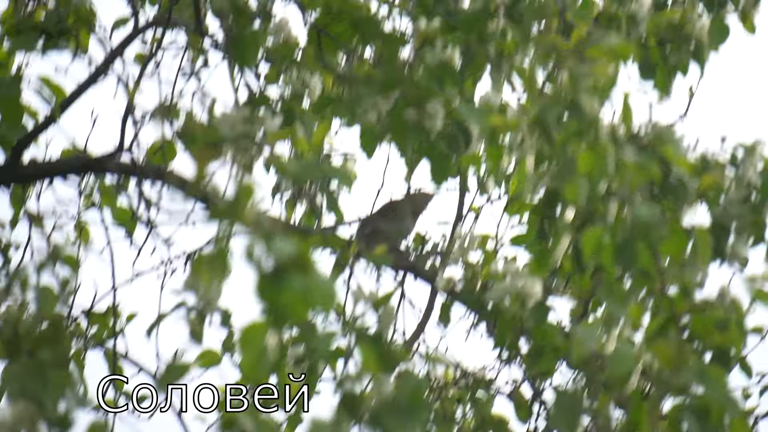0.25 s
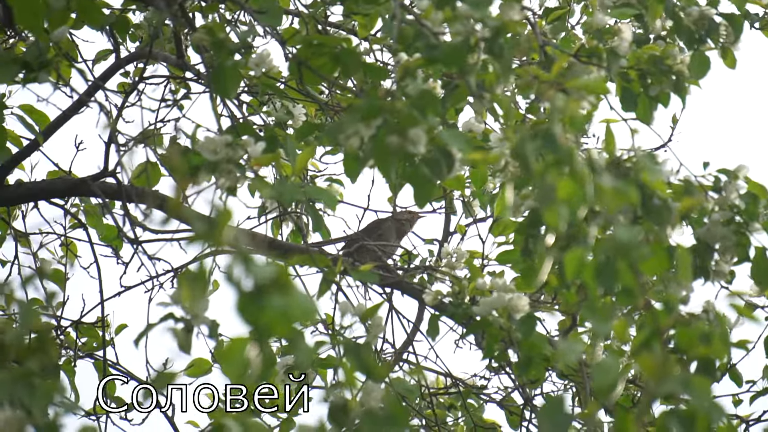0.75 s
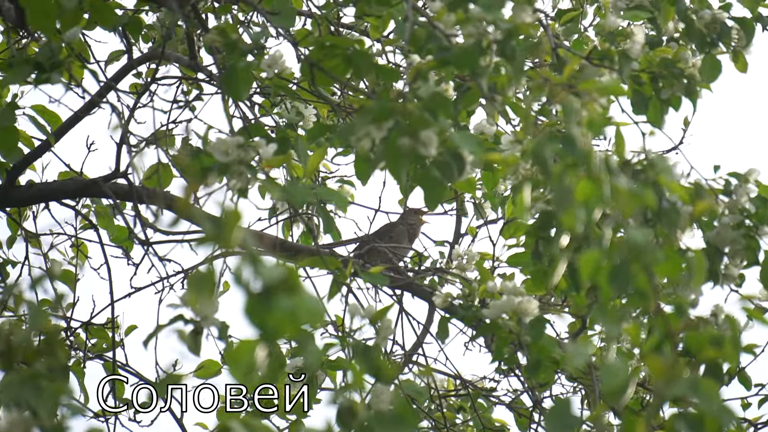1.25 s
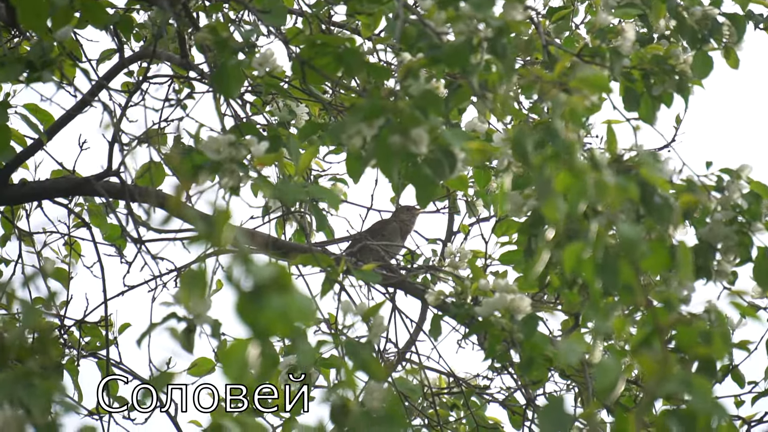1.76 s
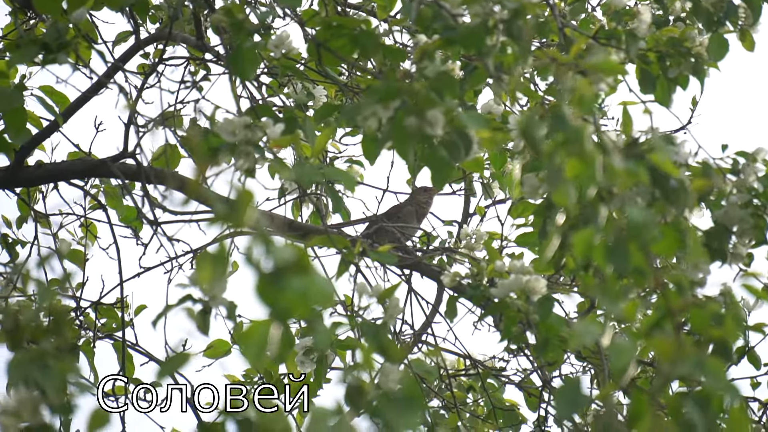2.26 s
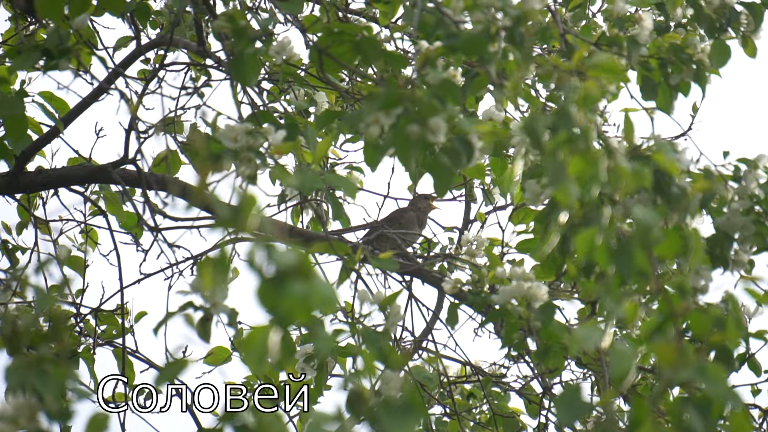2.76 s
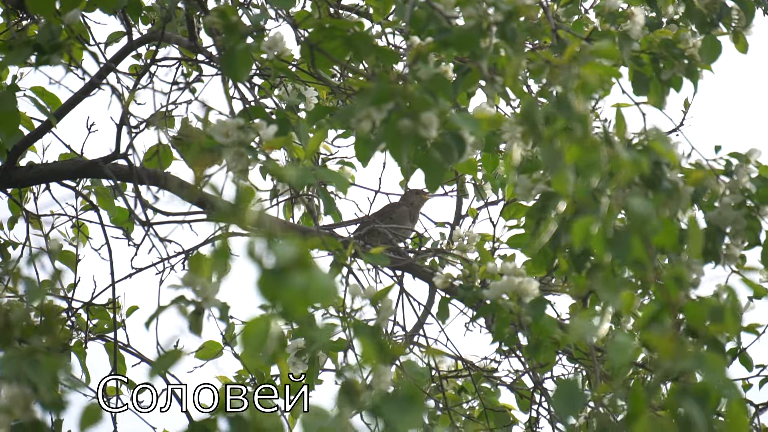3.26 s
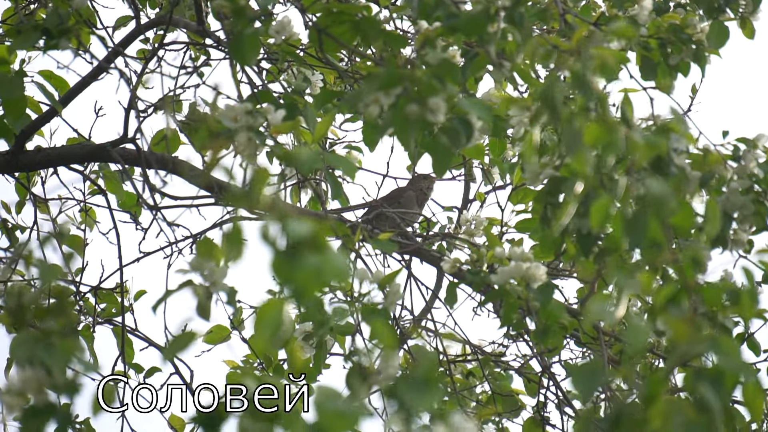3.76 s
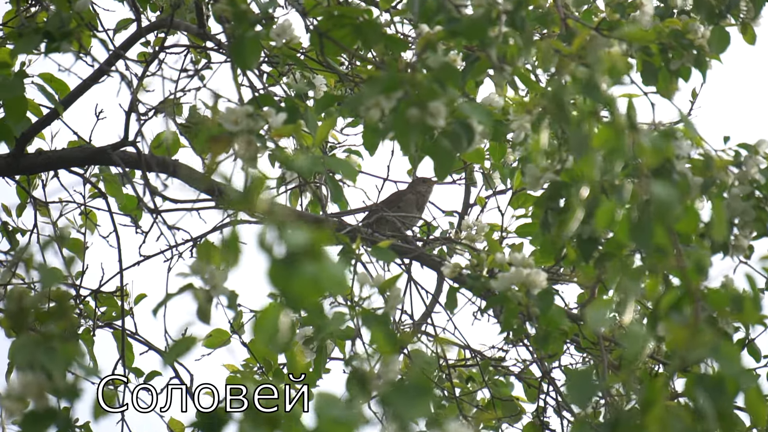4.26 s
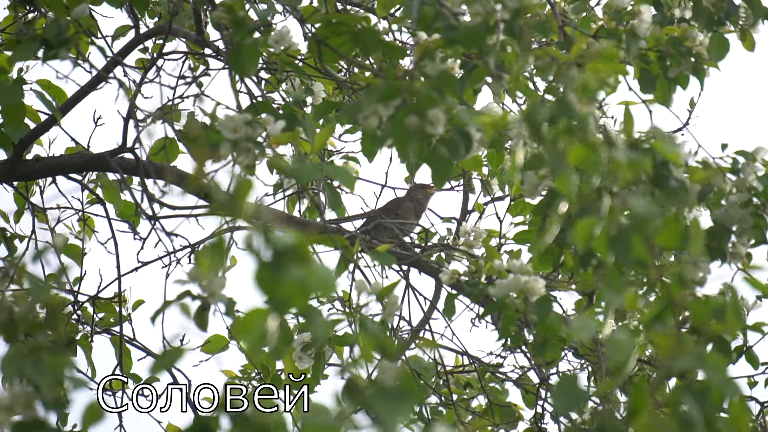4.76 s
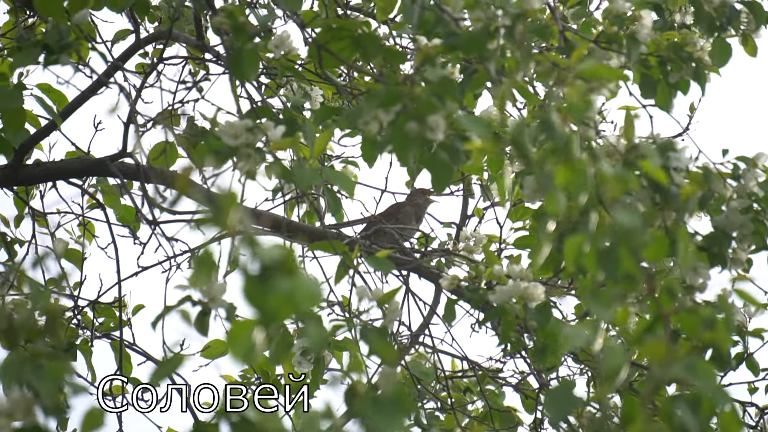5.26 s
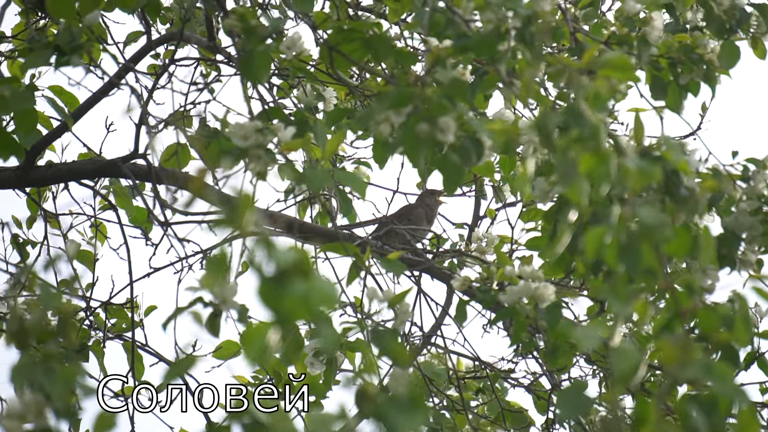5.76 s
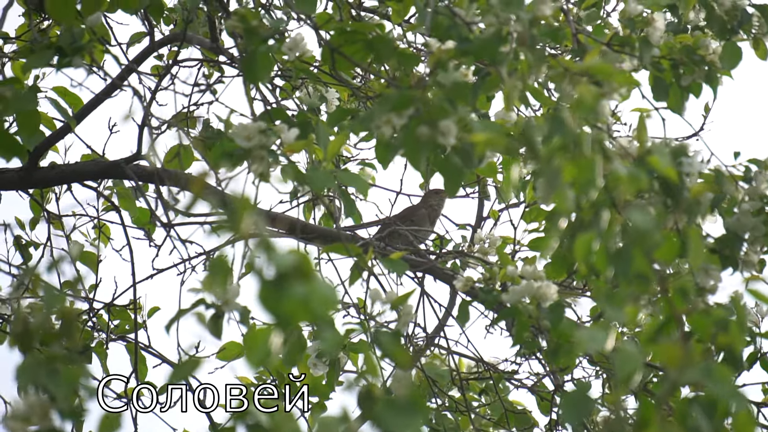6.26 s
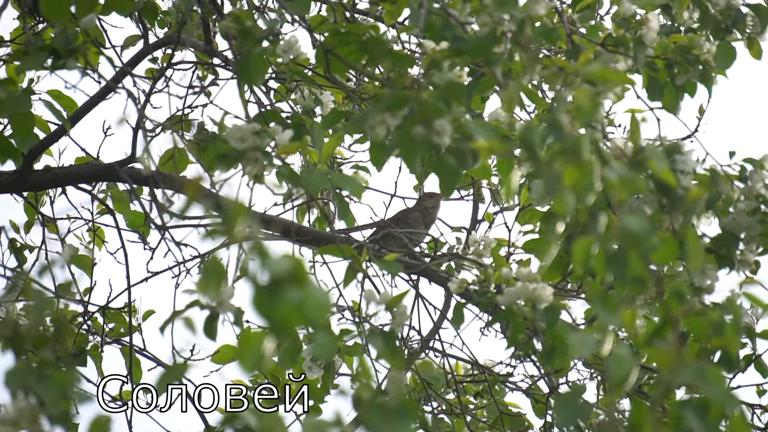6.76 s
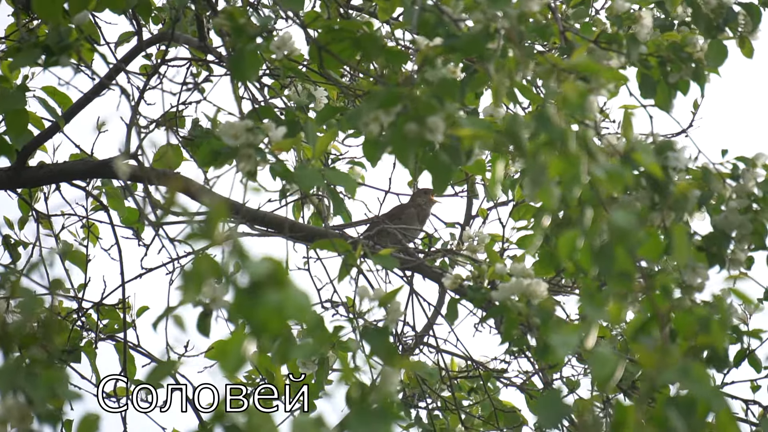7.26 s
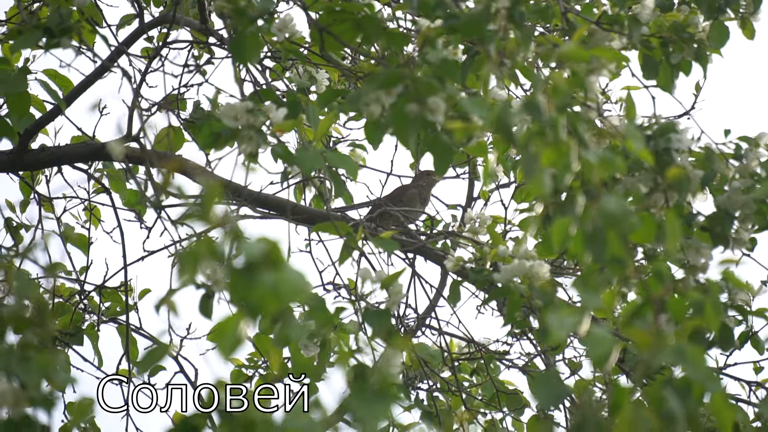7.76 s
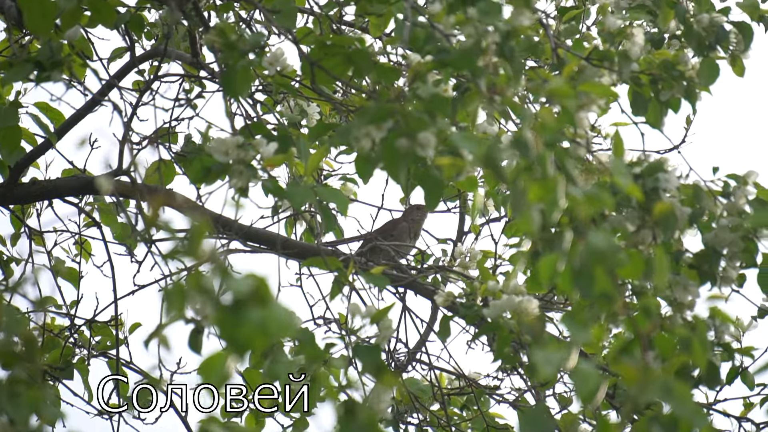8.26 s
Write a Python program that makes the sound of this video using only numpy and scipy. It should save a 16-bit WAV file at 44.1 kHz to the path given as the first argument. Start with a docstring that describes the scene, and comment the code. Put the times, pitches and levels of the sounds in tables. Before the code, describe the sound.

A nightingale sings loudly outdoors, mixing clear whistles, dry rattles, steep slurs and chucks, while hands rustle and bump the microphone.

```python
"""Nightingale in foliage

A nightingale sings whistles, steep slurs and chucks as frequency-modulated tones with weak overtones.
Its dry clicks and rattles are short bursts of snaps, falling sweep and noise; foliage scatters the sound.
A second bird further off repeats a thin falling note, as a sine gliding at a constant rate in octaves.
Close by, filtered noise rustles against the hand-held microphone, with damped bumps and single slips,
over a low outdoor rumble and a wash of air and leaves, both made of coloured noise."""
import sys
import numpy as np
from scipy import signal
from scipy.fft import rfft, irfft, next_fast_len
from scipy.io import wavfile
from scipy.ndimage import uniform_filter1d, minimum_filter1d

SR = 44100
rng = np.random.default_rng(int(sys.argv[2]) if len(sys.argv) > 2 else 0)


def unload_audio(sound):
    """Save the sound as a 16-bit wav file, at the path given as the first command line argument."""
    columns = np.transpose(np.atleast_2d(sound))
    # keep every value between -1 and 1, then stretch to whole-number steps
    steps = np.round(np.clip(columns, -1, 1) * 32767)
    wavfile.write(sys.argv[1], SR, steps.astype(np.int16))


N = 375732
TIME = np.arange(N) / SR
CUTOFF_HZ = 15800  # upper band limit


def from_db(db):
    """Decibel law: 20 dB is a tenfold amplitude."""
    return 10 ** (np.asarray(db) / 20)


def rms_one(x):
    """Normalisation to unit root-mean-square amplitude."""
    return x / np.sqrt(np.mean(x ** 2) + 1e-20)


def in_time(rows):
    """Linear interpolation of a control curve at every sample."""
    times, values = np.transpose(rows)
    return np.interp(TIME, times, values)


def at_hz(points, hz):
    """Interpolation of a spectrum in dB along a logarithmic frequency axis."""
    freqs, levels = np.transpose(points)
    return np.interp(np.log(np.maximum(hz, 1)), np.log(freqs), levels)


def coloured(x, spectrum):
    """Linear filtering: each frequency component is multiplied by its gain."""
    size = next_fast_len(len(x))
    gain = from_db(at_hz(spectrum, np.fft.rfftfreq(size, 1 / SR)))
    return irfft(rfft(x, size) * gain, size)[:len(x)]


def drift(rate):
    """Random modulation: normal draws at the given rate per second, joined by straight lines."""
    knots = rng.standard_normal(N // 8)
    return np.interp(TIME * rate, np.arange(len(knots)), knots)


def butter(x, hz, kind, order=2):
    """Recursive filtering with a maximally flat passband."""
    sections = signal.butter(order, hz, kind, fs=SR, output="sos")
    return signal.sosfilt(sections, x + 1e-18)


def add(track, s, sound):
    """Superposition: mix a sound into a track at time s."""
    start = max(round(s * SR), 0)
    part = sound[:max(N - start, 0)]
    track[start:start + len(part)] += part


# Level of the low rumble. Each row: time in seconds, level in dB before trim and flutter.
RUMBLE_LEVEL = [(0, -23.5), (.28, -28.5), (.45, -18), (.73, -30), (1.07, -16), (1.23, -23), (1.99, -22),
                (2.3, -27.5), (3.25, -28), (3.8, -30.5), (5.1, -24.5), (5.6, -29.5), (6.06, -29),
                (6.55, -29.5), (6.65, -15), (6.88, -28.5), (8.52, -30.5)]
# Spectrum of the rumble. Each row: frequency in Hz, gain in dB.
RUMBLE_COLOUR = [(15, 4), (30, 0), (50, -3.5), (66, -3), (85, -13), (130, -22), (250, -32.5), (600, -37.5)]
# Level of the wash of air and leaves. Each row: time in seconds, level in dB.
AIR_LEVEL = [(0, -39), (1.9, -39), (2.15, -45.5), (4.2, -45), (7.1, -42.5), (7.4, -43.5)]
# Spectrum of the wash. Each row: frequency in Hz, gain in dB.
AIR_COLOUR = [(60, 9.5), (150, 3), (300, -1), (700, 4), (1100, 0.5), (1700, -11.5), (3000, -9.5),
              (4400, -6.5), (5600, -24), (7500, -24.5), (9500, -12.5), (12000, -22.5), (15500, -21.5)]


def outdoors(trim_db=-1.5, flutter_db=1.9):
    """Stationary noise shaped in spectrum and level: low rumble under a wash of air and leaves."""
    rumble = coloured(rng.standard_normal(N), RUMBLE_COLOUR + [(2000, -100)])
    rumble = rms_one(butter(rumble, 13.3, "high"))
    air = rms_one(coloured(rng.standard_normal(N), AIR_COLOUR))
    rumble_db = in_time(RUMBLE_LEVEL) + trim_db + flutter_db * drift(13)
    return from_db(rumble_db) * rumble + from_db(in_time(AIR_LEVEL)) * air


# Bumps on the microphone. Each row: start in seconds, level in dB before the common trim.
BUMPS = [(.523, -16.5), (.989, -17.5), (1.045, -15.5), (1.104, -13), (2.778, -22), (3.239, -26),
         (3.296, -16.5), (5.318, -17.5), (5.896, -21), (6.045, -13.5), (6.648, -9.5), (6.792, -16)]


def bumps(thud_hz=160, thud_s=0.0051, knock_hz=420, knock_s=0.0062, knock=0.41, trim_db=1):
    """Damped oscillation: a heavily damped thud joined by a decaying burst of low-passed noise."""
    out = np.zeros(N)
    t = np.arange(SR // 10) / SR
    for s, db in BUMPS:
        thud = np.sin(2 * np.pi * thud_hz * t) * np.exp(-t / thud_s)
        crunch = rms_one(butter(rng.standard_normal(len(t)), knock_hz, "low")) * np.exp(-t / knock_s)
        add(out, s, from_db(db + trim_db) * (thud + knock * crunch))
    return out


# Single slips at the microphone. Each row: start in seconds, level in dB before the decay.
TICKS = [(2.159, -22.5), (3.3, -18), (6.049, -12), (7.124, -29), (8.178, -33)]


def ticks(decay_s=0.0013):
    """Impulsive excitation: short noise bursts with exponential decay and the colour of the rubbing."""
    out = np.zeros(N)
    t = np.arange(SR // 100) / SR
    for s, db in TICKS:
        slip = rms_one(coloured(rng.standard_normal(len(t)), RUB_COLOUR))
        add(out, s, from_db(db) * slip * np.exp(-t / decay_s))
    return out


# First long rub. Each row: time in seconds, level of its hiss in dB before the trims.
LONG_RUB = [(0.78, -52), (0.854, -37.5), (0.974, -27.5), (0.994, -13.5), (1.028, -40), (1.056, -26.5),
            (1.068, -35.5), (1.118, -25.5), (1.22, -39.5), (1.45, -24.5), (1.47, -35), (1.778, -26),
            (1.828, -20), (1.86, -23), (2.108, -35), (2.18, -62)]
# Separate short rubs. Each row: start, hardest point and end in seconds, level at the hardest in dB
# before the common trim.
SHORT_RUBS = [(2.53, 2.79, 3.07, -29), (2.97, 3.044, 3.18, -33.5), (3.228, 3.24, 3.16, -22.5),
              (3.311, 3.37, 3.51, -23.5), (3.613, 3.702, 3.8, -35.5), (3.83, 3.868, 3.98, -36.5),
              (4.11, 4.117, 4.38, -41.5), (4.292, 4.408, 4.49, -32), (4.572, 4.79, 4.94, -26),
              (5.033, 5.141, 5.185, -22), (5.258, 5.302, 5.75, -36.5), (5.67, 5.715, 5.8, -28),
              (5.885, 5.925, 5.99, -24.5), (6.047, 6.05, 6.17, -21), (6.48, 6.666, 6.72, -25),
              (6.782, 6.81, 6.99, -23), (7.001, 7.011, 7.062, -23)]


def rub_level(long_trim_db=3, rest_db=-63, swell_db=8.5, catch_db_per_s=4000, release_db_per_s=491):
    """Contact pressure as a level in dB: at each moment the strongest of all rubs and light contact."""
    s, db = np.transpose(LONG_RUB)
    long_rub = np.interp(TIME, s, db + long_trim_db, left=rest_db, right=rest_db)
    level = np.maximum(long_rub, rest_db)
    # a short rub catches quickly, swells to its hardest point and lets go more slowly
    for start, hardest, end, peak_db in SHORT_RUBS:
        swell = np.interp(TIME, [start, hardest, end], [-swell_db, 0, -swell_db])
        catch = catch_db_per_s * np.maximum(start - TIME, 0)
        release = release_db_per_s * np.maximum(TIME - end, 0)
        level = np.maximum(level, peak_db + swell - (catch + release))
    return level


# Resonances of the microphone housing. Each row: frequency in Hz, gain in dB.
RUB_COLOUR = [(300, -10), (900, -14.5), (1800, -17.5), (3000, -16.5), (4000, -8), (4800, -0.5), (5800, 2.5),
              (6700, -12), (7900, -11.5), (9400, -2), (10800, -19), (12300, -15.5), (14200, -32),
              (15800, -32)]


def rustle(grain_db=-1.5, stick_db=2.5, trim_db=1):
    """Stick-slip friction: dense tiny slips hiss in the resonances of the microphone housing."""
    unevenness_db = grain_db * drift(1500) + stick_db * drift(110)
    slips = rng.standard_normal(N) * from_db(unevenness_db)
    return rms_one(coloured(slips, RUB_COLOUR)) * from_db(rub_level() + trim_db)


# Runs of the far bird. Each row: first and last note start in seconds, count of notes,
# note length in seconds, level in dB before the common trim.
FAR_RUNS = [(0.449, 0.901, 8, .026, -26.5), (1.047, 1.123, 2, .026, -23.5), (1.999, 2.266, 4, 0.046, -28),
            (3.204, 3.759, 9, .028, -29.5), (5.228, 5.604, 5, .044, -31), (6.46, 6.789, 6, .023, -31),
            (7.657, 8.146, 6, .042, -27.5)]


def far_notes():
    """Isochronous rhythm: an even beat within each run, as (start s, length s, dB)."""
    out = []
    for first, last, count, length, db in FAR_RUNS:
        out += [(s, length, db) for s in np.linspace(first, last, round(count))]
    return out


def far_bird(middle_hz=3500, octaves_per_s=15, trim_db=-1):
    """Exponential glide: all notes fall at one rate in octaves, so longer ones span more."""
    out = np.zeros(N)
    for s, length, db in far_notes():
        t = np.arange(round(length * SR)) / SR
        pitch = middle_hz * 2 ** (octaves_per_s * (length / 2 - t))
        swell = np.sqrt(np.abs(np.sin(np.pi * t / length))) * (1 - .5 * t / length)
        tone = np.sin(2 * np.pi * np.cumsum(pitch) / SR)
        add(out, s, from_db(db + trim_db) * swell * tone)
    return out


# Spectrum of the echoes. Each row: frequency in Hz, gain in dB.
ECHO_COLOUR = [(900, -1), (1700, -1.5), (2350, 4), (3100, 3), (4400, 6.5), (5400, 3.5), (7000, 11.5),
               (10000, 9), (15000, -15)]


def foliage(x, near_db=-12, near_t60=0.14, far_db=-22, far_t60=0.88, dull_hz=5500):
    """Scattering by convolution: branches return sparse echoes, trees beyond a longer, duller tail."""
    t = np.arange(int(1.5 * SR)) / SR
    # about 2500 echoes a second, beginning after 2 ms; t60 is the time in seconds to fall by 60 dB
    branches = rng.standard_normal(len(t)) * (rng.random(len(t)) < 2500 / SR) * (t > .002)
    near = branches * from_db(-60 * t / near_t60)
    tail = butter(rng.standard_normal(len(t)), dull_hz, "low")
    far = tail * from_db(-60 * t / far_t60) * (1 - np.exp(-t / 0.0022))
    echoes = from_db(near_db) * near / np.linalg.norm(near) + from_db(far_db) * far / np.linalg.norm(far)
    return signal.fftconvolve(x, coloured(echoes, ECHO_COLOUR))[:N]


# Rattles, a buzz and then three clicks. Each row: start in seconds, level in dB and treble gain in dB,
# both before the common trims.
RATTLES = [(2.507, -6, -10.5), (2.785, -5.5, -4.5), (3.067, -8, -4.5), (3.364, -6.5, -9)]
BUZZ_S, BUZZ_DB = 0.021, -2  # the level is against the clicks
RATTLE_FIRST_S, RATTLE_GAP_S, RATTLE_CLICK_S = .037, .029, 0.0058
# the clicks before a slur start light and end loud and dull: (dB, length s, treble dB), before trims
LIGHT_CLICK, DULL_CLICK = (-12.5, 0.0052, -6), (-7.5, 0.0046, -16.5)
LAST_CLICK_LEAD_S = .015
# chucks open with a faint click: dB against the note, treble dB, both before trims; length s
CHUCK_CLICK_DB, CHUCK_CLICK_BRIGHT_DB, CHUCK_CLICK_S = -14.5, -8.5, 0.0046
# pips carry a faint bright buzz: dB against the note, treble dB, both before trims
PIP_BUZZ_DB, PIP_BUZZ_BRIGHT_DB = -27, 23


def click_pattern(count=3):
    """Temporal grouping of the clicks, as (start s, dB, length s, treble dB)."""
    out = []
    for s, db, bright_db in RATTLES:
        out.append((s, db + BUZZ_DB, BUZZ_S, bright_db))
        for k in range(count):
            out.append((s + RATTLE_FIRST_S + k * RATTLE_GAP_S, db, RATTLE_CLICK_S, bright_db))
    for s, _, gap, loud in SLURS:
        # counted backwards from the slur
        for k in range(count + 1):
            kind = DULL_CLICK if k < round(loud) else LIGHT_CLICK
            out.append((s - LAST_CLICK_LEAD_S - k * gap, *kind))
    for s, _, db in list(CHUCKS) + chuck_run():
        out.append((s, db + CHUCK_CLICK_DB, CHUCK_CLICK_S, CHUCK_CLICK_BRIGHT_DB))
    for s, length, db in PIPS:
        out.append((s, db + PIP_BUZZ_DB, length, PIP_BUZZ_BRIGHT_DB))
    return out


# Spectrum of a click. Each row: frequency in Hz, gain in dB.
CLICK_COLOUR = [(1000, -32.5), (1700, -22.5), (2500, -17), (3400, -12), (4700, 11.5), (5500, -8),
                (7000, -10.5), (9400, -0.5), (12000, -10), (15500, -34)]


def clicks(top_hz=6000, fall_s=.0058, snap_hz=830, snap=0.94, sweep=0.69, rasp=1.0, jitter=0.038,
           decay_s=0.002, onset=0.3, bright_trim_db=5, trim_db=-1):
    """Pulse excitation: rough membrane snaps with a falling sweep; held longer, the snaps make a buzz."""
    out = np.zeros(N)
    t = np.arange(SR // 25) / SR
    for s, db, length, bright_db in click_pattern():
        unsteady = 1 + jitter * rms_one(butter(rng.standard_normal(len(t)), snap_hz, "low"))
        # one impulse at each completed cycle
        cycles = np.floor(np.cumsum(snap_hz * unsteady) / SR)
        snaps = rms_one(np.diff(cycles, prepend=0))
        phase = 2 * np.pi * np.cumsum(top_hz * np.exp(-t / fall_s) * unsteady) / SR
        falling = np.sin(phase) + np.sin(2 * phase)
        source = snap * snaps + sweep * falling + rasp * rng.standard_normal(len(t))
        source = coloured(source, CLICK_COLOUR)
        source = coloured(source, [(5000, 0), (8000, bright_db + bright_trim_db)])
        # even out the running power, so that the swell alone sets the level
        source /= np.sqrt(2 * uniform_filter1d(source ** 2, size=130))
        # pressure builds through the click and then decays
        build = np.interp(t, [0, .0006, length / 2], [0, onset, 1])
        swell = build * np.exp(-np.maximum(t - 0.67 * length, 0) / decay_s)
        add(out, s, source * swell * from_db(db + trim_db))
    return out


def note(s, db, length, start_hz, end_hz, bend, contour_db):
    """Frequency glide starting at time s, its level contour shifted by db."""
    return s, length, start_hz, end_hz, bend, *np.add(contour_db, db)


def lead_in(s, db, shape):
    """Glide continuity: a note that ends at time s, where the main note takes over."""
    return note(s - shape["length"], db, **shape)


# The song is built from a few note shapes: length in s, pitch in Hz. A glide with a large bend moves
# early and then settles, a negative one moves late; contour_db is the level at the start, a third,
# two thirds and the end. The levels in the rows below are added to it.

# Lone chucks. Each row: start in seconds, length in seconds, level in dB.
CHUCKS = [(.44, 0.014, -21), (1.726, .014, -10.5), (2.051, 0.016, -9.5), (2.386, 0.016, -7),
          (3.798, 0.00786, -27), (4.462, .008, -28.5)]
CHUCK = dict(start_hz=2652, end_hz=1140, bend=1.9, contour_db=(-6.5, -1, -11.5, -20.5))
# a run of chucks slows a little and grows louder
RUN_START_S, RUN_GAP_S, RUN_SLOWING_S = 6.461, .0856, .00041
RUN_CHUCK_S, RUN_DB, RUN_GROWTH_DB = 0.01, -15.5, 0.51  # growth per chuck


def chuck_run(count=10):
    """Decelerating rhythm: chucks at widening gaps, each louder, as (start s, length s, dB)."""
    out = []
    for k in range(count):
        start = RUN_START_S + RUN_GAP_S * k + RUN_SLOWING_S * k * k
        out.append((start, RUN_CHUCK_S, RUN_DB + RUN_GROWTH_DB * k))
    return out


# "Tsip", a thin high tone that breaks into a steep drop. Each row: time of the drop in seconds,
# level in dB.
TSIPS = [(.022, -8.5), (.563, -5), (1.144, -8.5)]
TSIP_HOLD = dict(length=.022, start_hz=7300, end_hz=7630, bend=3, contour_db=(-24, -21, -20, -18))
TSIP_DROP = dict(length=.009, start_hz=8280, end_hz=3970, bend=.8, contour_db=(-12.5, -9, 3, -11.5))
# Rising whistles, each scooped into from below. Each row: start in seconds, top pitch in Hz,
# bend (no unit), level in dB.
WHISTLES = [(.152, 3180, 3, -1), (.697, 3213, 0.182, 0.5), (1.277, 3265, 1.56, -1)]
WHISTLE_SCOOP = dict(length=.011, start_hz=2266, end_hz=2790, bend=0.462, contour_db=(-24.5, -22, -15, -10))
WHISTLE = dict(length=.088, start_hz=2824, contour_db=(-7, -4.5, -9, -9.5))
# Piping calls, a nearly level tone, a lower one, then a sharp flick up and down. Each row: start in
# seconds, opening pitch in Hz, time of the flick's top in seconds.
PIPINGS = [(3.893, 2315, 4.215), (4.541, 2358, 4.846)]
PIPE = dict(length=.074, end_hz=2354, bend=-0.97, contour_db=(-27.5, -10.5, -7.5, -6))
PIPE_LOW_AFTER_S = .096
PIPE_LOW = dict(length=.03, start_hz=1896, end_hz=1978, bend=-2.18, contour_db=(-21, -15.5, -17.5, -12.5))
FLICK_UP = dict(length=.0056, start_hz=3525, end_hz=6110, bend=2, contour_db=(-15, -8, -10, -32))
FLICK_DOWN = dict(length=0.017, start_hz=6230, end_hz=3500, bend=2.6, contour_db=(-20, 2, -16, -13.5))
# Loud closing swoops, each entered steeply from above. Each row: start in seconds, length in seconds,
# end pitch in Hz, bend (no unit).
SWOOPS = [(7.362, 0.058, 2112, 4.25), (7.441, 0.04, 2035, 1.7), (7.562, .065, 2110, 5),
          (7.653, .012, 2835, 2.7)]
SWOOP_ENTRY = dict(length=0.00198, start_hz=4400, end_hz=3450, bend=0.93, contour_db=(-24, -17, -17, -15))
SWOOP = dict(start_hz=3370, contour_db=(-4.5, -12, -9, -15.5))
# Stuttered pips. Each row: start in seconds, length in seconds, level in dB.
PIPS = [(1.534, .014, -5), (1.872, 0.0099, -11), (1.896, 0.013, -7), (1.92, 0.012, -7.5),
        (2.207, 0.01094, -8.5), (2.232, 0.018, -3), (2.267, 0.015, -5.5)]
PIP = dict(start_hz=2280, end_hz=1720, bend=1.8, contour_db=(-8, -2, -4, -8.5))
# Long falls, as at the end of a stutter. Each row: start in seconds, length in seconds,
# end pitch in Hz, level in dB.
FALLS = [(1.556, 0.079, 1520, -8), (1.942, 0.048, 1300, -10.5), (2.29, .035, 1231, -10.5),
         (5.078, 0.039, 1295, -10)]
FALL = dict(start_hz=2000, bend=.6, contour_db=(4, -2.5, -7.5, -15))
# Long slurs that level out low, each led in by four clicks. Each row: start in seconds, level in dB,
# gap between the clicks in seconds, count of loud clicks.
SLURS = [(5.47, -8.5, 0.058, 1), (5.87, -7, .0554, 1), (6.254, -10, .052, 2)]
SLUR = dict(length=.068, start_hz=3720, end_hz=1450, bend=5.1, contour_db=(1, -5, -17, -21.5))
# Thin high whistles. Each row: start in seconds, length in seconds, level in dB.
THIN_NOTES = [(3.556, .035, -19), (7.86, 0.1926, -34.5)]
THIN = dict(start_hz=7760, end_hz=7540, bend=2.82, contour_db=(-3, 0.5, -5, -9))
# Soft low notes between the loud ones. Each row: start in seconds, start pitch in Hz, level in dB.
LOW_NOTES = [(5.029, 1230, -31.5), (6.835, 998, -40.5), (7.185, 1038, -37.5)]
LOW_NOTE = dict(length=.031, bend=0.98, contour_db=(8, -1, 2, -1))
LOW_SAG = .925  # end pitch over start pitch


def notes():
    """Decomposition of the song: every syllable spelled out as frequency glides."""
    out = []
    for s, db in TSIPS:
        out += [lead_in(s, db, TSIP_HOLD), note(s, db, **TSIP_DROP)]
    for s, top_hz, bend, db in WHISTLES:
        out += [lead_in(s, db, WHISTLE_SCOOP), note(s, db, end_hz=top_hz, bend=bend, **WHISTLE)]
    for s, hz, flick_s in PIPINGS:
        out += [note(s, 0, start_hz=hz, **PIPE), note(s + PIPE_LOW_AFTER_S, 0, **PIPE_LOW)]
        out += [lead_in(flick_s, 0, FLICK_UP), note(flick_s, 0, **FLICK_DOWN)]
    for s, length, end_hz, bend in SWOOPS:
        out += [lead_in(s, 0, SWOOP_ENTRY), note(s, 0, length, end_hz=end_hz, bend=bend, **SWOOP)]
    out += [note(s, db, length, **PIP) for s, length, db in PIPS]
    out += [note(s, db, length, end_hz=end_hz, **FALL) for s, length, end_hz, db in FALLS]
    out += [note(s, db, **SLUR) for s, db, *_ in SLURS]
    out += [note(s, db, length, **THIN) for s, length, db in THIN_NOTES]
    out += [note(s, db, start_hz=hz, end_hz=hz * LOW_SAG, **LOW_NOTE) for s, hz, db in LOW_NOTES]
    out += [note(s, db, length, **CHUCK) for s, length, db in list(CHUCKS) + chuck_run()]
    return out


# Overtones of the voice. Each row: multiple of the pitch, level in dB before the beak's colour.
OVERTONES = [(2, -20.5), (3, -21.5), (4, -45), (5, -33.5)]
# Resonance of the beak. Each row: frequency in Hz, gain in dB.
BEAK_COLOUR = [(2500, -19.5), (4700, 0.5), (6200, -28.5), (7200, -30.5), (9500, 7), (12000, 0.5),
               (16000, -19)]


def song(waver=0.0034, flutter_db=2.2, edge_s=0.0012, release_s=0.0013):
    """Frequency modulation of one near-sine voice, with overtones weighted by the beak's resonance."""
    pitch, loudness = np.full(N, np.nan), np.zeros(N)
    for s, length, start_hz, end_hz, bend, *levels in notes():
        at = np.flatnonzero((TIME >= s) & (TIME < s + length))
        u = np.linspace(0, 1, len(at))
        curve = bend + 1e-6
        travelled = np.expm1(-curve * u) / np.expm1(-curve)
        pitch[at] = start_hz + (end_hz - start_hz) * travelled
        loudness[at] = from_db(np.interp(u, np.linspace(0, 1, len(levels)), levels))
    # pitch bridges the silences so that the phase stays continuous
    sung = np.isfinite(pitch)
    pitch = np.interp(TIME, TIME[sung], pitch[sung]) * (1 + waver * drift(300))
    phase = 2 * np.pi * np.cumsum(pitch) / SR
    voice = np.sin(phase)
    for multiple, db in OVERTONES:
        k = round(multiple)
        gain = from_db(db + at_hz(BEAK_COLOUR, k * pitch))
        voice += np.sin(k * phase) * gain * (k * pitch < CUTOFF_HZ)
    # the membranes take a moment to come to rest after each note
    sinking = TIME / release_s
    loudness = np.exp(np.maximum.accumulate(np.log(loudness + 1e-9) + sinking) - sinking)
    smooth = uniform_filter1d(loudness, max(round(edge_s * SR), 2))
    return voice * smooth * from_db(flutter_db * drift(150))


def scene():
    """Superposition of both birds, their echoes in the trees and the noises at the microphone."""
    birds = song() + clicks() + far_bird()
    handling = rustle() + ticks() + bumps()
    return (birds + foliage(birds) + handling + outdoors())[None]


def record(dry, release_db_per_s=1500):
    """Peak limiting and band limiting: fast gain reduction above full scale, then a steep low-pass."""
    over_db = 20 * np.log10(np.maximum(np.abs(dry[0]), 1))
    release_db = release_db_per_s * TIME
    held_db = np.maximum.accumulate(over_db + release_db) - release_db
    # look about and smooth over 45 samples, near 1 ms
    gain = uniform_filter1d(minimum_filter1d(from_db(-held_db), size=45), size=45)
    low_pass = signal.ellip(12, .1, 110, CUTOFF_HZ, fs=SR, output="sos")
    return signal.sosfilt(low_pass, dry * gain)


dry = scene()
out = record(dry)
unload_audio(out)
```